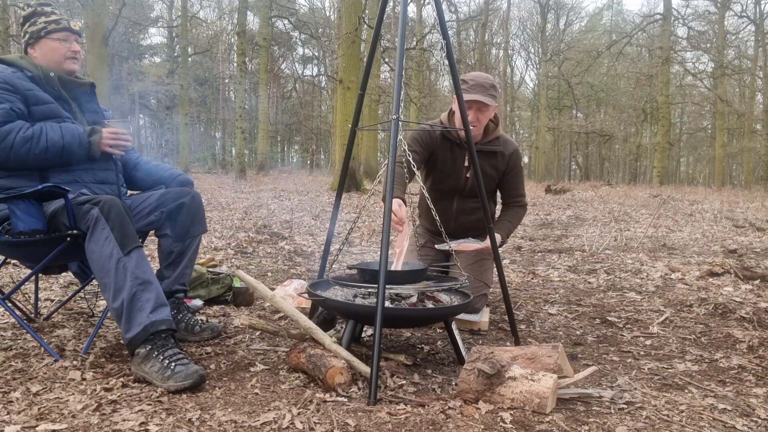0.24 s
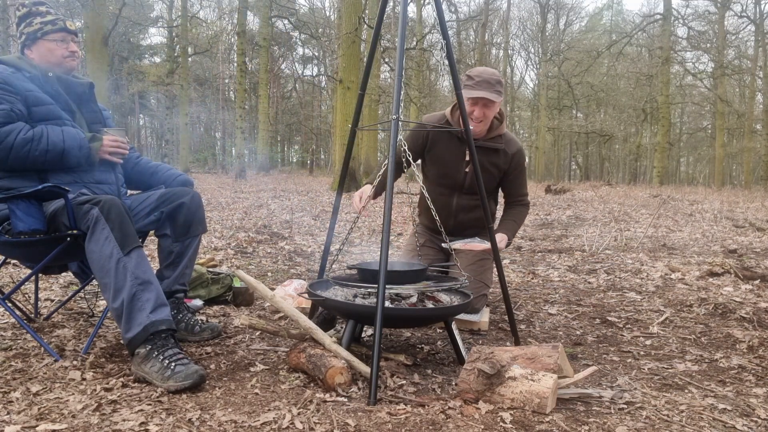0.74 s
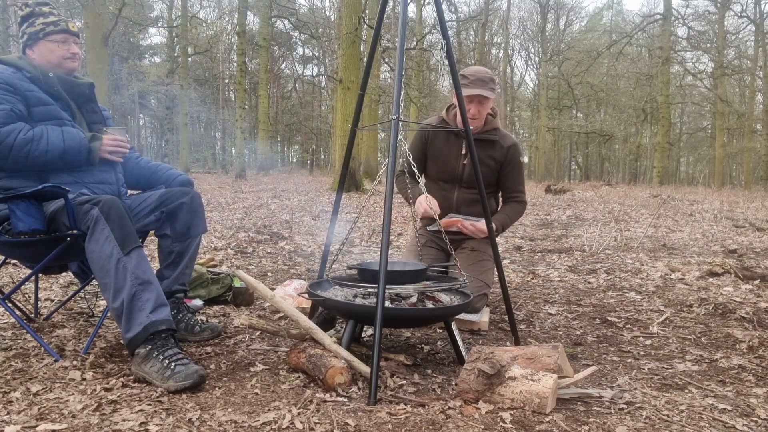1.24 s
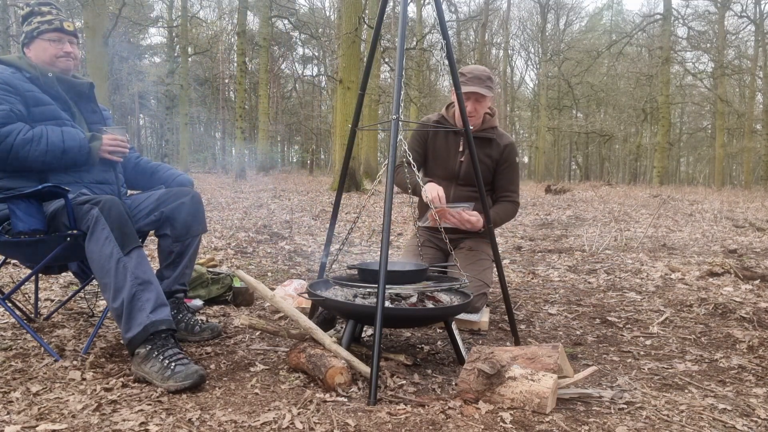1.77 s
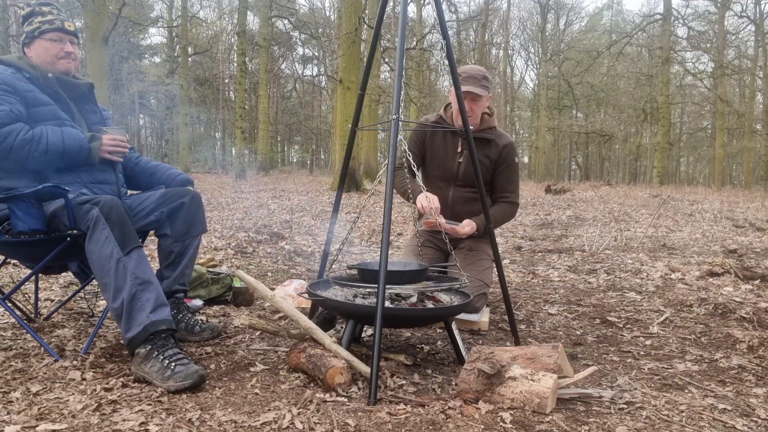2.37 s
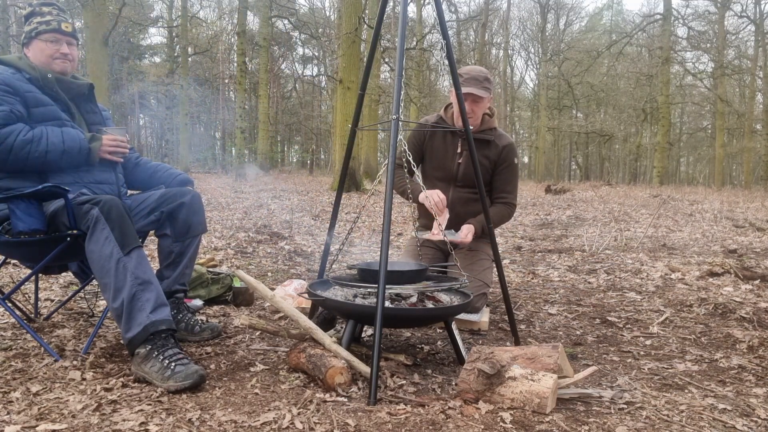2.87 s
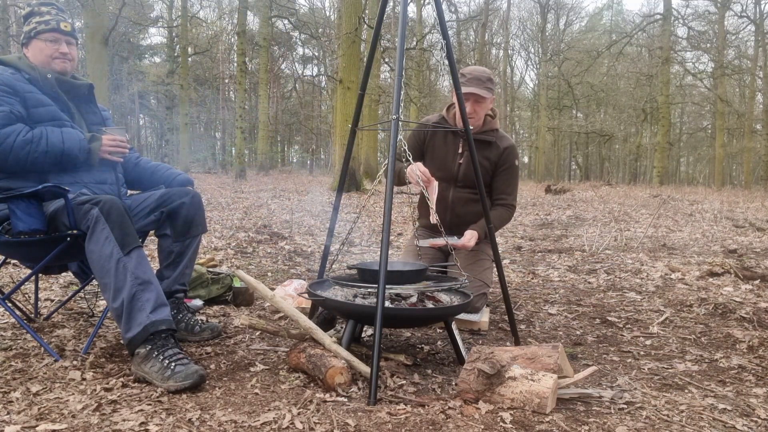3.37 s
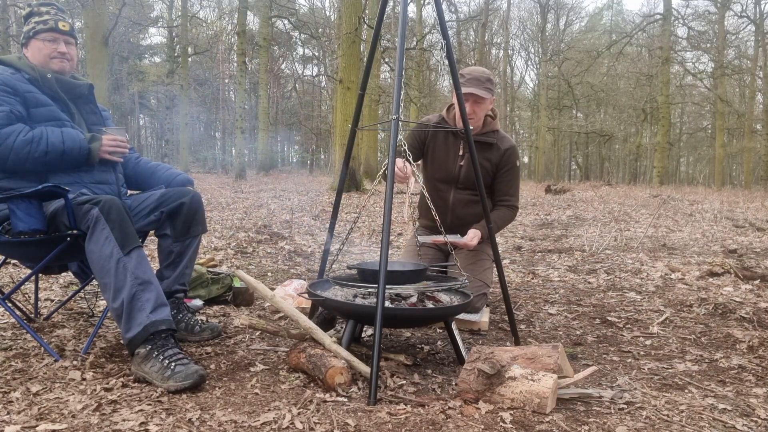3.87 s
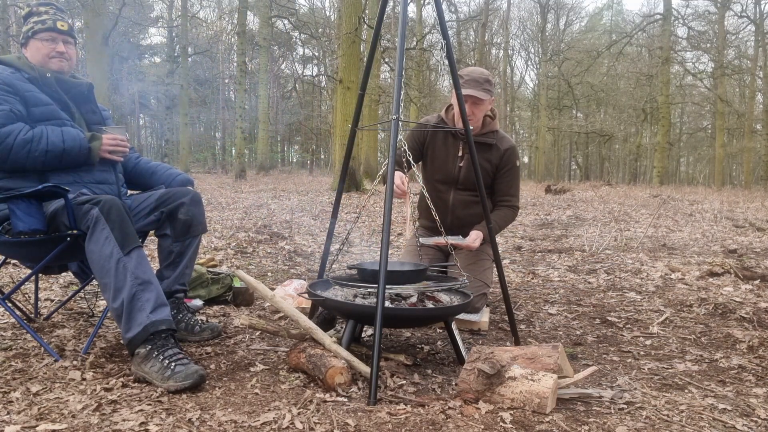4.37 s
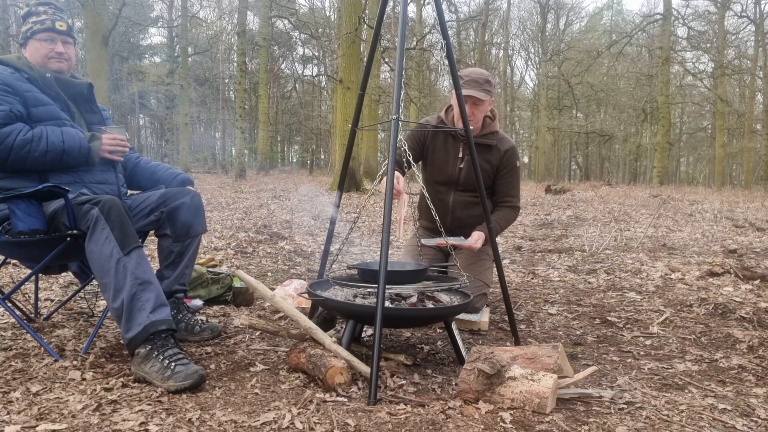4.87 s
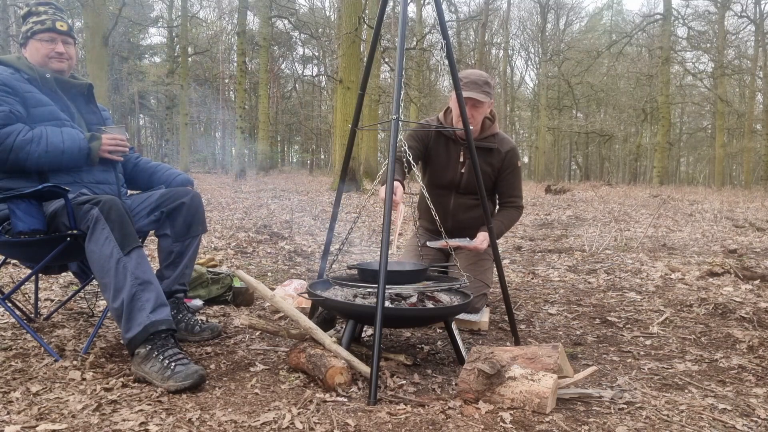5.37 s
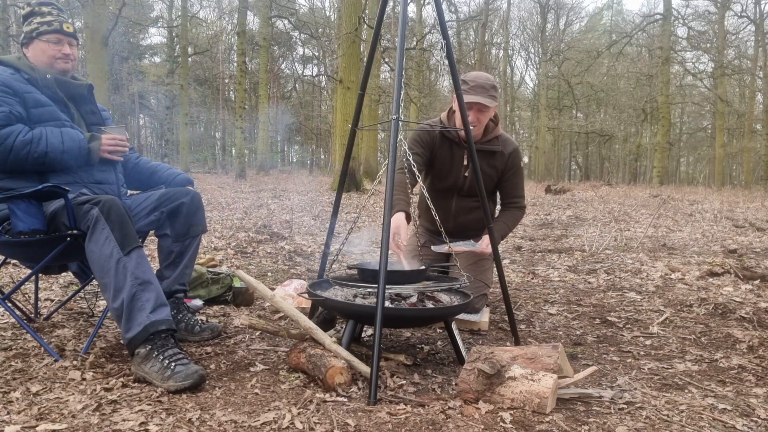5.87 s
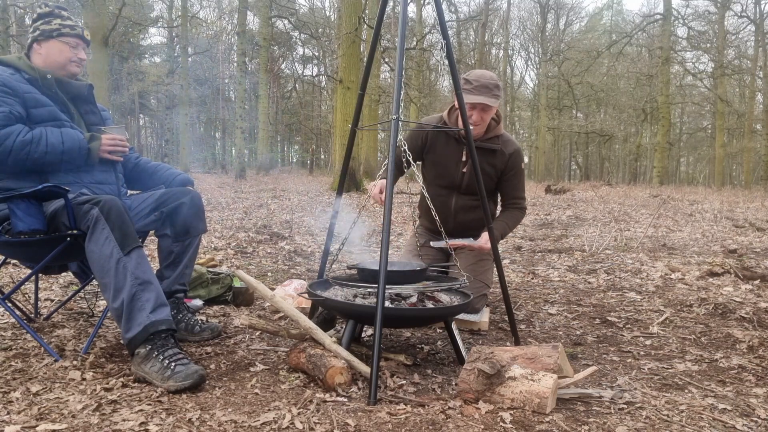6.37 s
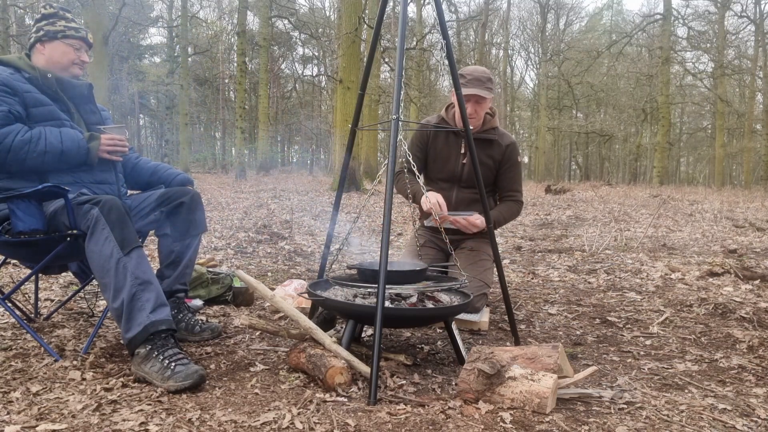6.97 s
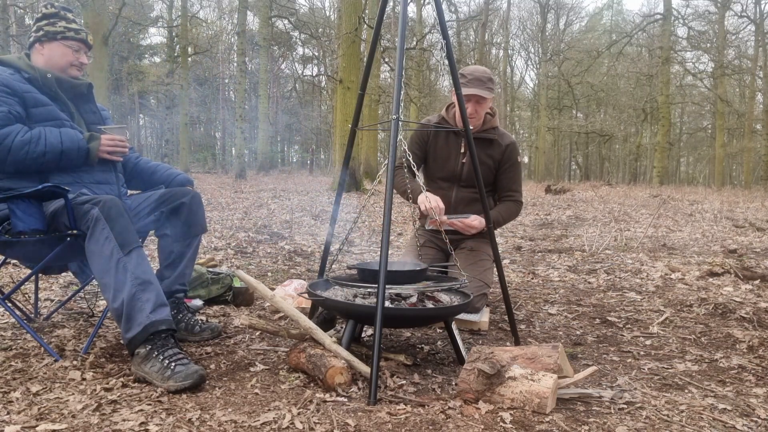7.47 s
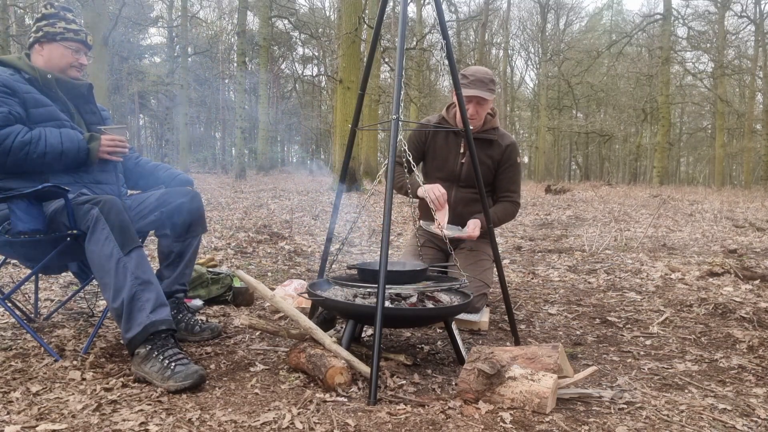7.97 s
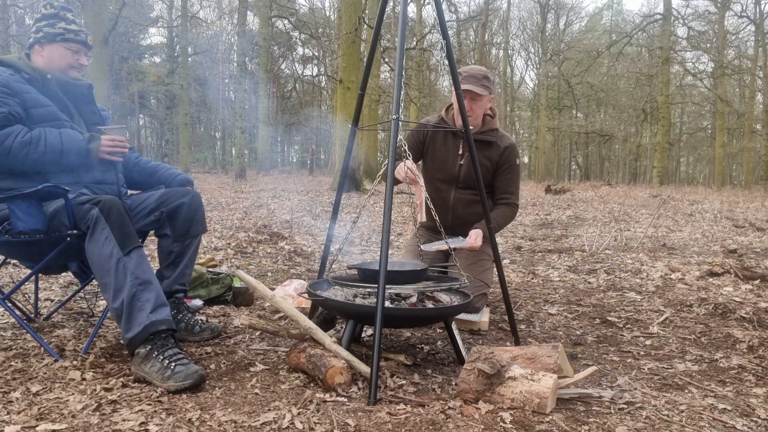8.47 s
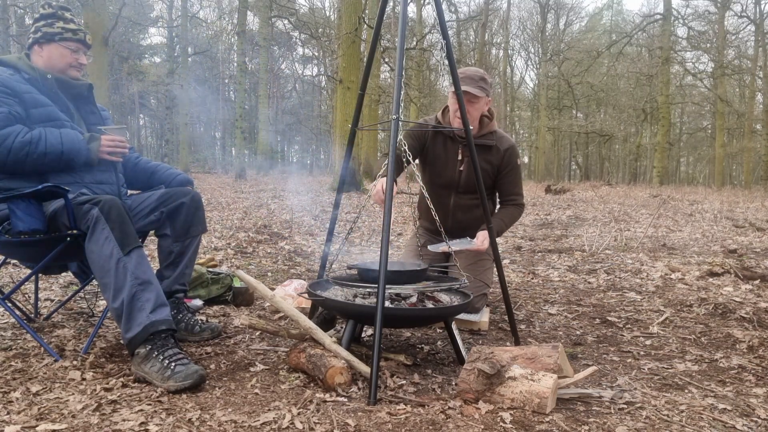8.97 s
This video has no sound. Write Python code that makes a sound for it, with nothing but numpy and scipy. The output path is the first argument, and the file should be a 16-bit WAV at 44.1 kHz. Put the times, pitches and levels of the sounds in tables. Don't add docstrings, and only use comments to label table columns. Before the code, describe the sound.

Bacon fries in an iron pan over a wood fire in open woodland, heard from a few metres away in stereo. A steady bright hiss of steam swells slightly, with low boiling underneath. Hollow bubbles plop, fat spits and ticks irregularly, and dull knocks come from wood and pan. Faint birds whistle and trill early on; a distant engine hums low throughout, and soft ground thumps come late.

```python
import sys
import numpy as np
from scipy import signal
from scipy.io import wavfile
from scipy.ndimage import uniform_filter1d

SR = 44100
rng = np.random.default_rng(int(sys.argv[2]) if len(sys.argv) > 2 else 0)


def rack_gain(trim_db):
    fader = np.asarray(trim_db, float)
    return 10 ** (fader / 20)


def store_pcm(level_fs):
    pcm = np.round(np.clip(level_fs, -1, 1) * 32767).astype(np.int16)
    wavfile.write(sys.argv[1], SR, np.atleast_2d(pcm).T)


N = 407043


def evened(x):
    return x / np.sqrt(np.mean(x ** 2) + 1e-20)


def read(points, hz):
    f, value = np.transpose(points)
    return np.interp(np.log(hz + 1), np.log(f + 1), value)


def curve(rows):
    time_s, level_db = np.transpose(rows)
    return np.interp(np.arange(N) / SR, time_s, level_db)


def add(mix, start_s, sound):
    part = mix[..., round(start_s * SR):][..., :sound.shape[-1]]
    part += sound[..., :part.shape[-1]]


def coloured(x, points):
    level_db = np.maximum(read(points, abs(np.fft.fftfreq(2048, 1 / SR))), -80)
    log_gain = np.log(rack_gain(level_db))
    taps = np.fft.ifft(np.exp(np.conj(signal.hilbert(log_gain)))).real[:1024]
    taps = taps.reshape((1,) * (x.ndim - 1) + (-1,))
    return signal.oaconvolve(x, taps, axes=-1)[..., :x.shape[-1]]


# pitch_hz, likeness [0..1]
LIKENESS = [(60, 0.79), (130, 0.95), (290, 0.79), (640, 0.67), (1410, 1), (3100, 0.68), (6820, 0.17),
            (15000, 0.2)]


def noise(points, patchy_db, flicker_db, size=512):
    hop, hz = size // 4, np.fft.rfftfreq(size, 1 / SR)
    a, b, c, d, patches = rng.standard_normal((N // hop + 5, len(hz), 5)).T
    flicker = evened(uniform_filter1d(patches[0], size=4))
    patches = uniform_filter1d(patches, size=7, axis=0)
    patches = evened(uniform_filter1d(patches, size=9, axis=1))
    same = np.clip(read(LIKENESS, hz), -1, 1)[:, None]
    left = a + 1j * b
    right = same * left + np.sqrt(1 - same ** 2) * (c + 1j * d)
    level_db = read(points, hz)[:, None] + patchy_db * patches + flicker_db * flicker
    spectra = np.array([left, right]) * rack_gain(level_db)
    return evened(signal.istft(spectra, nperseg=size, noverlap=size - hop)[1][:, :N])


def bubble(hz, cycles, glide=0.0079):
    turns = np.arange(1200) * hz / SR
    age = turns / max(cycles, .3)
    ring = np.sin(2 * np.pi * turns * (1 + glide * np.minimum(turns, 6)))
    return ring * (age * np.exp(1 - age)) ** 3.56


def grains(low_hz, high_hz, cycles, per_s, spread_db, count=24):
    size = rack_gain(spread_db * np.minimum(rng.exponential(1, N), 3.5)) * (rng.random(N) < per_s / SR)
    kind, at = rng.integers(0, count, N), np.flatnonzero(size)
    shapes = np.array([bubble(hz, cycles)[:500] for hz in np.geomspace(low_hz, high_hz, count)])
    places = at[:, None] + np.arange(shapes.shape[1])
    sounds = size[at, None] * shapes[kind[at]]
    return np.bincount(places.ravel(), sounds.ravel(), 2 * N)[:N]


def nearby(x, wet_db, t60_s, likeness):
    t, dry_pair = np.arange(2600) / SR, x * np.ones((2, 1))
    out = dry_pair
    spot = np.arange(N) // 1500 % 3
    decay = rack_gain(-60 * t / t60_s) * (t > .002)
    for k in range(3):
        both, *own = rng.standard_normal((3, len(t))) * (rng.random((3, len(t))) < .15)
        taps = (likeness * both + np.sqrt(1 - likeness ** 2) * np.array(own)) * decay
        taps *= rack_gain(wet_db) / np.linalg.norm(taps[0])
        out = out + signal.oaconvolve(dry_pair * (spot == k), taps, axes=1)[:, :N]
    return out


HOLLOW_HZ, HOLLOW_WIDTH_HZ = 1260, 220


def hollow(x, db):
    b, a = signal.iirpeak(HOLLOW_HZ, HOLLOW_HZ / HOLLOW_WIDTH_HZ, SR)
    return x + rack_gain(db) * signal.lfilter(b, a, x)


# time_s, sizzle_db
HEAT = [(0.0, -53.5), (0.77, -51.5), (0.95, -53), (1.59, -52), (3.78, -52), (4.04, -54), (5.22, -50.5),
        (6.01, -51.5), (6.42, -53), (7.32, -51), (7.56, -51.5), (7.84, -53.5), (8.07, -53.5), (8.38, -51.5),
        (8.71, -53.5), (9.23, -51.5)]
# pitch_hz, level_db (per Hz)
FIZZ = [(1120, -31.5), (1900, -1.5), (2290, -6.5), (2960, -1.5), (3500, 0), (4440, -2), (6100, -2),
        (7210, 0), (8610, -11.5), (11500, -10), (15000, -4.5), (15700, -1.5)]
SPRAY_SHARE = 0.1


def fizz():
    swell = uniform_filter1d(rng.standard_normal(N), size=3500)
    swell = evened(uniform_filter1d(swell, size=2500))
    rate_per_s = 240 * rack_gain(4.6 * swell)
    ticks = rack_gain(4.6 * np.minimum(rng.exponential(1, (N, 3)), 3))
    ticks *= rng.random((N, 3)) < rate_per_s[:, None] / SR
    both, *own = (ticks * rng.choice([-1., 1.], (N, 3))).T
    ticks = nearby(both + 0.4 * np.array(own), -2.5, 0.011, 0.096)
    ticks = evened(coloured(ticks, FIZZ))
    beads = evened(nearby(grains(2590, 9500, 2.3, 450, 4.0, count=14), -9.5, 0.0074, 0.83))
    squeaks = evened(nearby(grains(2690, 4680, 10, 120, 3.6, count=12), -7, 0.12, 0.46))
    beads = beads + rack_gain(-3.0) * squeaks
    body = noise(FIZZ, patchy_db=2.0, flicker_db=-0.1) + rack_gain(-5.5) * ticks + rack_gain(-10) * beads
    top = signal.sosfilt(signal.butter(4, 8300, "high", fs=SR, output="sos"), body)
    heat_db = curve(HEAT)
    spray_gain = rack_gain(SPRAY_SHARE * (heat_db - heat_db.mean()))
    return rack_gain(heat_db + 2.0 + 0.44 * swell) * (body + top * (spray_gain - 1))


# time_s, level_db
GURGLE = [(0, -72), (1.0, -81), (1.5, -80), (5.0, -80), (5.3, -74), (5.8, -70), (6.1, -69), (6.7, -70),
          (7.0, -71), (9.23, -74)]
BOIL_DB, BOIL_SHARE = -62.5, 0.25


def bubbling():
    small = grains(1000, 1700, 1.8, 300, 3.5, count=10)
    low = hollow(small, 0.38) + rack_gain(-17) * grains(514, 910, 1.7, 60, 3.7, count=4)
    boil = evened(nearby(low, -6, 0.15, 0.88))
    b, a = signal.iirpeak(770, 14, SR)
    gurgle = evened(signal.lfilter(b, a, grains(730, 820, 2, 40, 3.3, count=3)))
    heat_db = curve(HEAT)
    boil_db = BOIL_DB + BOIL_SHARE * (heat_db - heat_db.mean())
    return rack_gain(boil_db) * boil + rack_gain(curve(GURGLE) - 2.0) * gurgle


# time_s, level_db
HUM = [(0.0, -58), (0.62, -58), (4.78, -56.5), (7.27, -56), (7.43, -54.5), (8.82, -58), (9.23, -55.5)]
# pitch_hz, level_db (per Hz)
WOOD = [(25, -49), (50, 6), (80, 4.5), (130, -6.5), (300, -11.5), (350, -13), (460, -17.5), (570, -10.5),
        (700, -12), (775, -17), (870, -14.5), (1200, -12), (2200, -24), (3000, -38)]
HUM_HZ, WOOD_DB = 71.4, -61.5


def distance():
    drift = evened(uniform_filter1d(rng.standard_normal(N), size=9000))
    note = np.sqrt(2) * np.sin(2 * np.pi * np.cumsum(HUM_HZ + 0.42 * drift) / SR)
    note *= 1 - 0.96 * np.exp(-((np.arange(N) / SR - 2.462) / 0.027) ** 2)
    wash = noise(WOOD, patchy_db=.8, flicker_db=.8, size=2048)
    return rack_gain(curve(HUM) + 1.1) * note + rack_gain(WOOD_DB) * wash


# peak_s, peak_db, pitch_hz, cycles
PLOPS = [(0.0027, -30.5, 1300, 2.2), (0.0982, -34.5, 1180, 2.1), (0.1894, -26, 1770, 0.99),
         (0.7828, -36.5, 1260, 1.2), (0.8141, -39, 1350, 1.45), (1.689, -30.5, 1305, 2.7),
         (1.7578, -31.5, 1490, 1.95), (1.8272, -34, 1350, 3.6), (2.3034, -38.5, 1240, 0.99),
         (3.4891, -28, 1320, 1.77), (3.6351, -36, 1180, 0.3), (4.7145, -31.5, 1230, 2),
         (4.767, -37.5, 1160, 1.9), (4.966, -27.5, 1920, 2.04), (5.4836, -36, 1300, 1.3),
         (5.8788, -35, 1480, 2.5), (5.8848, -22, 1520, 1.77), (5.8911, -22, 1490, 1.65),
         (6.1990, -41, 1260, 5.0), (6.2128, -23, 1360, 1.5), (6.3102, -34.5, 1130, 2.2),
         (6.3945, -31.5, 1110, 1.14), (6.4856, -41.5, 1100, 3.1), (6.6098, -34.5, 1090, 0.62),
         (7.2005, -30, 1080, 2.5), (7.2069, -22.5, 1290, 2.05), (7.2204, -32.5, 1730, 4.0),
         (7.2243, -26, 1260, 1.07), (8.0297, -16.5, 1260, 1.21), (8.9066, -38.5, 1140, 2.2)]
# peak_s, peak_db, pitch_hz
POPS = [(0.6094, -41.5, 1260), (0.635, -39.5, 1060), (0.792, -40, 1230), (0.8082, -36, 1300),
        (0.82, -42, 1230), (1.1717, -40.5, 1130), (1.205, -41, 1220), (1.559, -41.5, 1270),
        (1.9492, -41, 1240), (2.6606, -41, 1200), (2.751, -37.5, 1250), (4.676, -39.5, 1400),
        (5.015, -38, 1380), (5.0182, -36, 1480), (5.0828, -40.5, 1350), (5.1885, -41, 1430),
        (5.2605, -40, 1350), (5.303, -42, 1250), (5.3674, -39.5, 1390), (5.87, -34, 1540),
        (5.934, -43.5, 1370), (6.323, -37.5, 1210), (6.7594, -39.5, 1340), (7.1224, -42, 1140),
        (7.315, -37, 1260), (7.591, -44.5, 1170), (7.706, -37, 1040), (8.036, -53, 1430),
        (8.6818, -42.5, 1150), (8.752, -41.5, 1280)]
# start_s, peak_db
BLIPS = [(0.0475, -37), (0.938, -40), (1.039, -51), (1.2416, -48), (1.864, -39), (1.9945, -42),
         (2.0168, -44), (2.0778, -38), (2.226, -45), (2.282, -45), (2.489, -42), (3.2999, -41),
         (3.4367, -40), (3.924, -39), (4.6603, -38), (4.8323, -38.5), (5.1676, -39), (5.3503, -39),
         (5.4134, -39), (5.5135, -41), (5.66, -36), (5.794, -40), (5.813, -40), (5.902, -40), (6.6217, -34),
         (6.878, -40), (7.7184, -38), (8.103, -41), (8.3493, -40), (8.4033, -40.5)]
# start_s, peak_db, pitch_hz
SMALL_POPS = [(0.3636, -45, 1300), (0.4504, -53, 1180), (0.516, -43, 1380), (0.6878, -43, 1220),
              (0.7164, -44, 1640), (0.7573, -37, 1230), (1.496, -48, 1290), (1.545, -51, 1260),
              (2.146, -46, 1170), (2.781, -45, 1230), (2.9831, -47, 1280), (3.0814, -46, 1390),
              (3.4136, -47, 1240), (3.8581, -47, 1240), (4.058, -46, 1270), (4.4817, -45, 1250),
              (4.5094, -41, 1260), (5.4, -43, 1200), (5.6154, -45, 1230), (5.7305, -45, 1160),
              (5.864, -25, 1350), (6.0387, -43, 1410), (6.146, -47, 1260), (6.1733, -44, 1270),
              (6.3, -35, 1150), (6.669, -37, 1720), (6.7168, -47, 1110), (6.7456, -43, 1230),
              (6.783, -44, 1280), (6.8044, -46, 1100), (6.8458, -42, 1200), (6.8922, -43, 1050),
              (7.0274, -44, 1220), (7.152, -43, 1180), (7.621, -45, 1230), (7.8466, -56, 1210),
              (7.971, -48, 1240), (8.2267, -45, 1040), (8.2736, -44, 1220), (8.4508, -44, 1160),
              (8.666, -57, 1210), (8.8218, -48, 1240), (8.888, -37, 1140), (9.063, -48, 1140)]
POP_CYCLES = 1.76
BLIP_DB, BLIP_SPREAD = -4.5, .04
SMALL_DB, SMALL_TOP_DB = -3.5, -46.5


def plops():
    rings, pushes = np.zeros((2, N))
    rows = PLOPS + [(*row, POP_CYCLES) for row in POPS]
    for (peak_s, db, hz, cycles), leads in zip(rows, rng.random((len(rows), 3))):
        add(rings, max(peak_s - cycles / hz, 0), rack_gain(db - 0.4) * bubble(hz, cycles))
        add(pushes, peak_s, rack_gain(db - 22.5) * bubble(330, 0.42))
        for early in leads:
            lead_s = max(peak_s - .003 - 0.015 * early, 0)
            add(rings, lead_s, rack_gain(db - 19.5 - 10 * early) * bubble(hz, 2.9))
    for (start_s, db), chance in zip(BLIPS, rng.standard_normal(len(BLIPS))):
        hz = HOLLOW_HZ * (1 + BLIP_SPREAD * chance)
        add(rings, start_s, rack_gain(db + BLIP_DB) * bubble(hz, POP_CYCLES))
    for start_s, db, hz in SMALL_POPS:
        add(rings, start_s, rack_gain(min(db + SMALL_DB, SMALL_TOP_DB)) * bubble(hz, POP_CYCLES))
    return nearby(hollow(rings, -5.5) + pushes + knocks(), -8.5, 0.054, 0.94)


# start_s, peak_db
PUFFS = [(0.0343, -43), (0.1905, -43), (0.404, -42), (0.4429, -48), (0.4823, -42), (0.7133, -41),
         (0.8789, -38), (1.2426, -49), (1.256, -41), (1.3224, -49), (1.4641, -42), (1.4965, -37),
         (2.2453, -48), (2.395, -44), (2.4902, -46), (2.8739, -45), (3.1038, -39), (3.3912, -46),
         (3.8811, -42), (4.1325, -47), (4.2667, -43), (4.2857, -46), (4.5096, -45), (4.9641, -39),
         (5.3542, -43), (5.7803, -45), (5.7967, -41), (5.8321, -43), (5.8686, -41), (6.1863, -44),
         (6.3465, -48), (6.6907, -42), (6.8289, -51), (6.8828, -48), (7.4106, -40), (7.636, -41),
         (7.7428, -45), (8.0731, -37), (8.2626, -47), (8.996, -40)]
PUFF_DB, PUFF_S, PUFF_LOW_HZ = 1, 0.0023, 10000


def puffs():
    out, t = np.zeros((2, N)), np.arange(500) / SR
    high = signal.butter(4, PUFF_LOW_HZ, "high", fs=SR, output="sos")
    bursts = signal.sosfilt(high, rng.standard_normal((len(PUFFS), 2, len(t)))) * np.exp(-t / PUFF_S)
    for (start_s, db), burst in zip(PUFFS, bursts):
        add(out, start_s, rack_gain(db + PUFF_DB) * burst)
    return out


# peak_s, peak_db, pitch_hz, crack_db (over the peak)
SPITS = [(0.0354, -34, 6570, -11), (0.1896, -20, 2790, -27), (0.199, -46, 3440, -8),
         (0.4054, -36, 5700, -12), (0.7135, -42.5, 4830, -4), (0.8754, -41.5, 7600, -10),
         (1.2572, -39.5, 4030, -8.5), (1.471, -42, 6660, -5), (1.498, -39.5, 7450, -6),
         (1.9034, -29, 5000, -17), (1.9678, -39.5, 3500, -11), (3.6353, -37, 2940, -16),
         (3.8168, -44, 4300, -7), (4.2875, -37.5, 3940, -13), (4.714, -28.5, 6300, -20),
         (4.9274, -42.5, 3870, -7), (4.965, -21, 2800, -29), (4.9695, -32, 2530, -21),
         (4.975, -33, 3100, -28), (5.8343, -39.5, 7900, -11), (6.6707, -37.5, 2760, -15.5),
         (7.2193, -34.5, 3230, -13), (7.4113, -42, 7610, -10), (7.5826, -38, 3050, -9),
         (7.6372, -33, 3100, -5), (7.6473, -37, 7500, -14), (7.7427, -44.5, 3240, -8),
         (8.0744, -41.5, 3600, -6), (8.3473, -36.5, 3320, -24), (8.904, -39, 4640, -9.5)]
# peak_s, peak_db, pitch_hz
SOFT_SPITS = [(0.5542, -36.5, 3400), (1.2336, -32, 3300), (4.9676, -29.5, 3920), (4.9715, -38, 3030),
              (1.9413, -34, 3380), (2.156, -35, 4540), (3.032, -40, 4090), (3.1383, -33, 3220),
              (3.132, -40, 3370), (3.126, -39, 3900), (3.2087, -37.5, 3450), (4.309, -37, 2410),
              (4.396, -35.5, 3300), (4.599, -39, 4860), (5.0216, -37, 3570), (5.113, -38, 2770),
              (5.12, -39, 3740), (5.1695, -40, 2800), (6.031, -38, 3500), (6.0661, -36, 2800),
              (6.1924, -35.5, 3150), (6.5915, -36.5, 2720), (6.7494, -34.5, 3050), (7.2258, -30, 3100),
              (7.3358, -41, 4600), (8.238, -34, 2720), (8.2448, -36, 3340), (8.3078, -36, 2750),
              (8.4136, -40.5, 3000), (8.5238, -36, 3440), (8.5603, -38.5, 2980), (8.6864, -34.5, 2280)]
# peak_s, peak_db
TICKS = [(0.481, -37), (0.5163, -34), (0.604, -32.5), (0.6546, -31), (0.836, -35), (1.0849, -54),
         (1.11, -36), (2.0807, -38.5), (2.2435, -36), (2.3795, -37.5), (4.977, -33), (5.524, -33),
         (5.604, -37), (5.871, -30.5), (5.989, -32.5), (7.2903, -89), (7.3776, -35), (7.6188, -33),
         (8.16, -37), (8.1823, -48)]
# peak_s, peak_db, pitch_hz
FAINT_SPITS = [(0.0937, -38, 3060), (0.428, -35, 7060), (1.8703, -29, 3950), (2.6976, -30.5, 3560),
               (3.557, -32, 4250), (3.8454, -34, 7100), (3.9258, -33, 3300), (4.0542, -40, 4040),
               (4.1904, -33, 2940), (4.2114, -31, 2940), (4.4543, -38, 7040), (4.4942, -41, 3560),
               (4.5088, -28, 3750), (4.6683, -32, 7150), (4.9794, -35, 3500), (5.2883, -30, 4270),
               (5.3338, -33, 3360), (5.3896, -32, 3520), (5.7952, -35, 3590), (6.105, -41, 6990),
               (6.4556, -31.5, 2730), (6.5296, -40, 3080), (6.9159, -31, 2740), (6.9626, -32, 2840),
               (7.565, -39, 3010), (7.6091, -33, 3100), (7.728, -30, 3050), (7.8283, -31.5, 2840),
               (7.8825, -38, 3070), (8.3779, -30.5, 3270), (8.465, -33, 3430), (8.5969, -34, 4360),
               (8.6532, -45, 2830), (8.996, -33, 3120)]
# pitch_hz, level_db
DULLING = [(1500, -6), (3000, 0), (8000, -0.5), (11000, -3.5), (15500, -4)]
SPIT_RISE_S, SOFT_RISE_S = 0.00047, 0.00069
SOFT_CRACK_DB = -25.5
TICK_HZ, TICK_DB, TICK_CRACK_DB = 3300, -9, -9.5
FAINT_DB, FAINT_CRACK_DB = -9, -15


def spits():
    out, t = np.zeros((2, N)), np.arange(400) / SR
    rows = [(*row, SPIT_RISE_S) for row in SPITS]
    rows += [(*row, SOFT_CRACK_DB, SOFT_RISE_S) for row in SOFT_SPITS]
    rows += [(s, db + TICK_DB, TICK_HZ, TICK_CRACK_DB, SPIT_RISE_S) for s, db in TICKS]
    rows += [(s + .001, db + FAINT_DB, hz, FAINT_CRACK_DB, SPIT_RISE_S) for s, db, hz in FAINT_SPITS]
    pans = rng.standard_normal(len(rows))
    hard_front = 3.5 * (t == 0)
    bursts = (rng.standard_normal((len(rows), len(t))) + hard_front) * np.exp(-t / .0011)
    cracks = coloured(coloured(bursts, FIZZ), DULLING)
    for (peak_s, db, hz, crack_db, rise_s), pan, crack in zip(rows, pans, cracks):
        sides = rack_gain(db + 2.23 + 0.92 * pan * np.array([[1], [-1]]))
        add(out, peak_s - rise_s, sides * bubble(hz, rise_s * hz))
        add(out, peak_s - .0004, sides * rack_gain(crack_db + 18.5) * crack / abs(crack).max())
    return nearby(out, -5, 0.06, 0.68)


# start_s, peak_db, pitch_hz
KNOCKS = [(0.141, -40, 445), (0.183, -63, 820), (0.536, -43.5, 292), (0.853, -49, 820), (1.107, -52, 710),
          (1.183, -43, 766), (1.329, -48, 644), (1.362, -48, 716), (3.484, -52, 754), (3.603, -50, 675),
          (3.867, -46.5, 527), (4.507, -45.5, 314), (5.123, -52, 235), (5.125, -41, 740), (5.396, -55, 766),
          (5.515, -49, 784), (5.544, -51, 750), (5.727, -51, 790), (5.883, -42, 377), (6.208, -48, 372),
          (6.389, -64, 895), (6.477, -48, 805), (6.616, -45, 874), (6.648, -47, 734), (7.199, -55, 890),
          (7.783, -55, 696), (8.024, -34, 696), (8.788, -46.5, 660)]
# start_s, peak_db, pitch_hz
THUMPS = [
    (7.5, -44.5, 116),
    (8.19, -45.5, 103),
    (8.79, -52, 130),
]


def knocks():
    out = np.zeros(N)
    for start_s, db, hz in KNOCKS:
        add(out, start_s + 0.002, rack_gain(db) * bubble(hz, (hz / 510) ** 2))
    for start_s, db, hz in THUMPS:
        add(out, start_s, rack_gain(db) * bubble(hz, 0.65))
    return out


def whistle(length_s, from_hz, to_hz, db):
    u = np.linspace(0, 1, round(length_s * SR))
    waver, flutter = (evened(uniform_filter1d(v, size=300)) for v in rng.standard_normal((2, len(u))))
    hz = to_hz + (from_hz - to_hz) * (1 - u) ** 1.6 + 25 * waver
    tone = np.sqrt(2) * np.sin(2 * np.pi * np.cumsum(hz) / SR)
    return rack_gain(db + 2 * flutter) * tone * np.sin(np.pi * u)


# start_s, length_s, from_hz, to_hz, level_db
WHISTLES = [(.57, .09, 4900, 4800, -59), (1.285, .08, 7480, 7400, -55.5), (1.49, .07, 4500, 4330, -57.5),
            (1.88, .12, 4050, 4050, -63), (2.27, .09, 5850, 6250, -61), (2.28, .13, 6650, 6600, -61),
            (2.43, .08, 4900, 4600, -61), (2.75, .11, 6000, 5850, -62.5), (3.778, .03, 7800, 7000, -54),
            (3.795, .026, 6900, 7100, -53), (1.4, .035, 5700, 6500, -60), (1.51, .05, 4000, 4150, -59)]
# start_s, spacing_s, notes, length_s, from_hz, to_hz, level_db
TRILLS = [
    (2.878, .0746, 12, .032, 4950, 4120, -57.5),
    (.735, .085, 6, .05, 3720, 3580, -58),
    (3.832, .019, 8, .018, 7120, 7230, -60.5),
]


def birds():
    out = np.zeros(N)
    for start_s, *note in WHISTLES:
        add(out, start_s, whistle(*note))
    for start_s, spacing_s, notes, *note in TRILLS:
        for k in range(notes):
            add(out, start_s + k * spacing_s, whistle(*note))
    return nearby(out, -9, .15, .3)


# pitch_hz, level_db
BOUNCE = [(220, 0), (335, 3), (460, -6), (570, 2), (640, 1), (700, -5), (775, 3), (870, -3), (1000, 0)]


def scene():
    bounced = fizz() + bubbling() + plops() + spits() + birds()
    return coloured(bounced, BOUNCE) + distance() + puffs()


def top_cut(x):
    return signal.sosfilt(signal.butter(12, 15800, fs=SR, output="sos"), x)


# pitch_hz, level_db
LEFT = [(60, 0.5), (240, -1), (950, 1), (3770, 1.5), (15000, 2)]
EDGE_HZ = 15840


def record(dry):
    left = coloured(dry[0], [(hz, db / 2) for hz, db in LEFT])
    right = coloured(np.roll(dry[1], 1), [(hz, -db / 2) for hz, db in LEFT])
    edge = signal.firwin(1023, EDGE_HZ, window=("kaiser", 9), fs=SR)[None]
    mix = signal.oaconvolve(np.array([left, right]), edge, "same")
    return top_cut(mix)


dry = scene()
out = record(dry)
store_pcm(out)
```